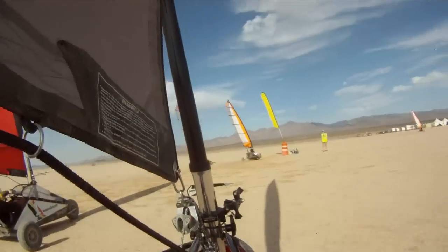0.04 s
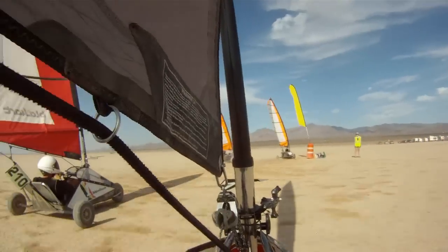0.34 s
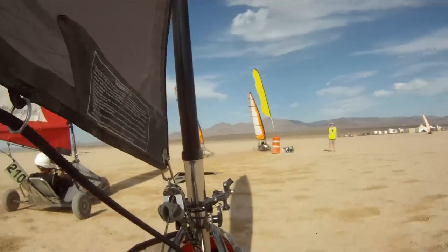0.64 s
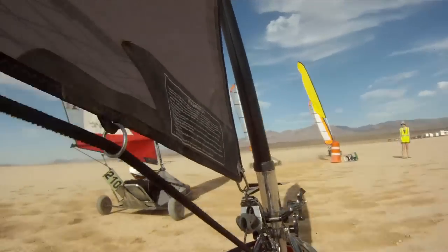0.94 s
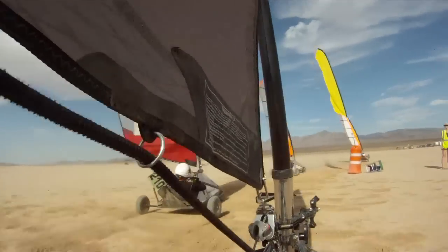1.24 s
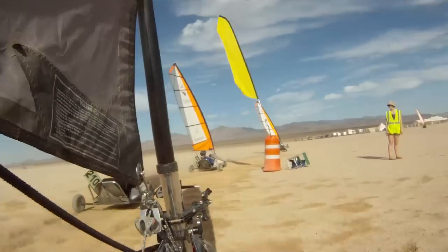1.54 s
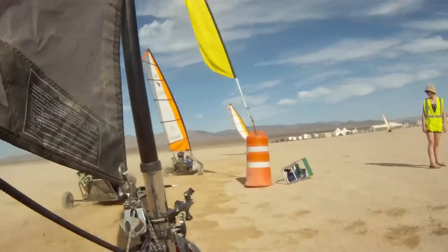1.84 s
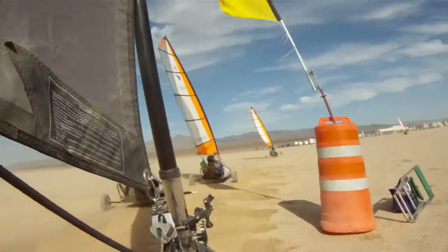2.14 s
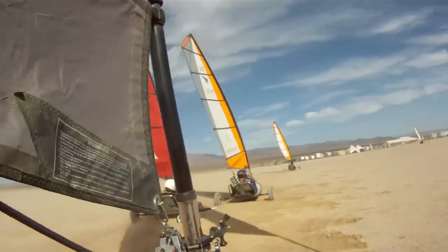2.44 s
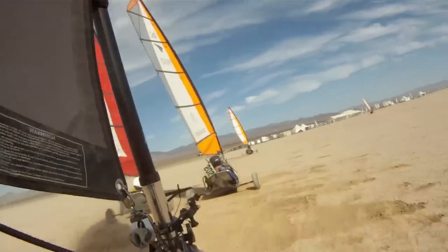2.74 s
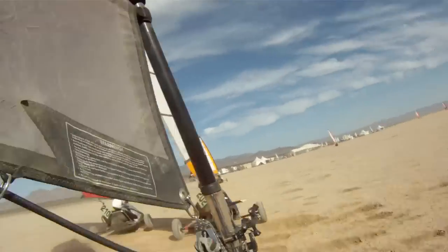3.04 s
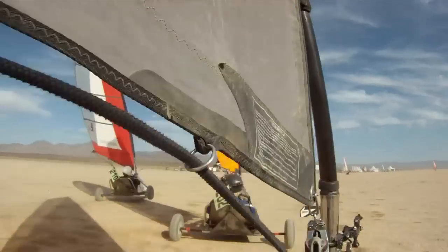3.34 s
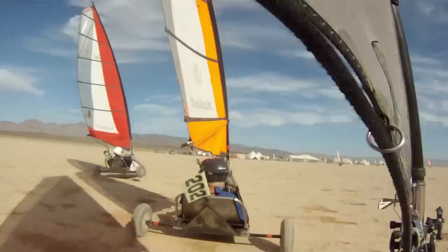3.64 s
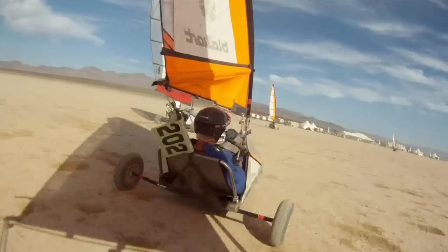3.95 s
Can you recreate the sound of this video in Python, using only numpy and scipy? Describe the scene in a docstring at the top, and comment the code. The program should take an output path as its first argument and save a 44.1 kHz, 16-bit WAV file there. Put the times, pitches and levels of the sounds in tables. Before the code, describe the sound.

A land-sailing kart rolls over hard ground, tyres hissing, frame rattling and booming louder.

```python
"""Land-sailing kart on a dry lake bed

The kart gathers speed over hard crust: wind and tyres hiss and crunch, steel fittings tick,
the rig knocks, the frame booms over bumps and the chassis shudders. It is heard from a camera on
the frame, which holds each sample at a low rate and so mirrors the sound into a gritty treble."""
import sys
import numpy as np
from scipy import signal
from scipy.fft import rfft, irfft, next_fast_len
from scipy.io import wavfile
from scipy.ndimage import uniform_filter1d, map_coordinates

SR = 44100
rng = np.random.default_rng(int(sys.argv[2]) if len(sys.argv) > 2 else 0)


def persist_wave(psi):
    """Save psi, clipped to +-1, as 16-bit WAV."""
    counts = np.round(np.clip(psi, -1, 1) * 32767).astype(np.int16)
    wavfile.write(sys.argv[1], SR, np.atleast_2d(counts).T)


N = 176400
TIME = np.arange(N) / SR


def amp(db):
    """Decibels to gain."""
    return 10 ** (np.asarray(db) / 20)


def unit(x):
    """Scale to rms 1."""
    return x / np.sqrt(np.mean(x ** 2) + 1e-20)


def curve(rows):
    """An automation curve through (time [s], value) rows."""
    return np.interp(TIME, *np.transpose(rows))


def wobble(knots_per_s):
    """A smooth random modulator."""
    knots = rng.standard_normal(int(N * knots_per_s / SR) + 4)
    return map_coordinates(knots, [TIME * knots_per_s])


def filtered(x, response):
    """Filter x by a function of frequency."""
    size = next_fast_len(N + SR // 2)
    return irfft(rfft(x, size) * response(np.fft.rfftfreq(size, 1 / SR)), size)[:N]


def equalised(x, points):
    """EQ x through (frequency [Hz], gain [dB]) points on a log axis."""
    freqs, db = np.transpose(points)
    return filtered(x, lambda hz: amp(np.interp(np.log(hz + 1), np.log(freqs + 1), db)))


def noise(points):
    """Equalised noise at rms 1."""
    return unit(equalised(rng.standard_normal(N), points))


def add(track, start_s, sound):
    """Mix a sound in at its cue."""
    part = track[max(round(start_s * SR), 0):][:len(sound)]
    part += sound[:len(part)]


def impacts(per_s, spread_db):
    """Impulses at random times with random sizes."""
    clicks = (rng.random(N) < per_s / SR) * rng.choice([-1, 1], N)
    return clicks * amp(spread_db * np.clip(rng.standard_normal(N), -2, 2))


def ring(modes, rise_s):
    """One contact and its softer bounce ring a set of modes, peak 1."""
    t = np.arange(SR // 8) / SR
    out = np.zeros(len(t))
    bounce_s = 0.0026 * (0.5 + rng.random())
    for start, contact_db in [(0, 0), (bounce_s, -4)]:
        tone = np.zeros(len(t))
        for hz, db, t60 in modes:
            decay = amp(contact_db + db + rng.normal(0, 1.48) - 60 * t / t60)
            tone += decay * np.sin(2 * np.pi * (hz * rng.normal(1, 0.01) * t + rng.random()))
        add(out, start, tone * (1 - np.exp(-t / rise_s)))
    return out / np.abs(out).max()


def strikes(cues, modes, rise_s):
    """Ring a set of modes at each (time [s], level [dB]) cue."""
    out = np.zeros(N)
    for start, db in cues:
        add(out, start, amp(db) * ring(modes, rise_s))
    return out


# Tone of the wind (frequency [Hz], gain [dB])
WIND_EQ = [(40, 0), (80, 5.5), (170, -3), (350, -1.5), (800, -2), (1200, -8), (3000, -25), (6000, -50)]

def wind():
    """Air rushing over the camera lays a faint, steady bed."""
    return amp(-67.5) * noise(WIND_EQ)


# Fader ride of the ground rumble (time [s], level [dB])
RUMBLE_RIDE = [(0.0, -61), (0.02, -65.5), (2.94, -55), (3.06, -51), (3.33, -54.5), (3.36, -47),
               (3.51, -53.5), (3.77, -52), (3.97, -62), (4.0, -42.5)]
# Tone of the rumble (frequency [Hz], gain [dB])
RUMBLE_EQ = [(15, -4), (30, -11), (60, 14.5), (100, 11), (125, 6), (160, -0.5), (220, -1), (320, -7.5),
             (500, -13.5), (900, -38.5)]

def ground_rumble():
    """Rolling over hard ground fills out the low end."""
    return amp(curve(RUMBLE_RIDE) + 6.5) * noise(RUMBLE_EQ)


# Fader ride of the rolling noise (time [s], level [dB])
ROLL_RIDE = [(0.0, -59), (0.99, -58.5), (1.57, -54.5), (2.53, -55), (2.66, -52.5), (2.96, -50),
             (3.12, -49.5), (3.49, -49), (3.59, -47.5), (3.72, -48), (4.0, -49.5)]
# Tone of the tyres and rushing air (frequency [Hz], gain [dB])
HISS_EQ = [(180, -30.5), (300, -7.5), (335, -3.5), (361, -8.5), (452, -9.5), (671, -11), (809, -10.5),
           (904, -3.5), (1050, -4.5), (1190, -3.5), (1310, -10.5), (1450, -4), (1830, -6.5), (2180, 2),
           (2380, -7), (2620, -4), (2860, -12.5), (3670, -13), (4050, -19.5), (5320, -19), (5800, -18.5),
           (7540, -57), (12800, -120)]

def tyres():
    """The tyres hiss, scrub sideways in surges and break the crust, all building with the pace."""
    scrub_hz, half_width_hz = 2060, 150
    ride_db = curve(ROLL_RIDE)
    hiss = amp(1.48 * wobble(35)) * noise(HISS_EQ)
    band = filtered(rng.standard_normal(N), lambda hz: 1 / (1 + ((hz - scrub_hz) / half_width_hz) ** 2))
    scrub = amp(-10.5) * unit(band * amp(4 * wobble(24.99)))
    grit = unit(equalised(impacts(per_s=300, spread_db=6.5), HISS_EQ))
    grit_db = -7 + 0.2 * (ride_db - ride_db.mean())  # the crunch builds faster than the hiss
    return amp(ride_db + 0.28) * (hiss + scrub + amp(grit_db) * grit)


# Clear ticks of the fittings (time [s], level [dB])
TICK_CUES = [(0.3346, -52), (0.5646, -54), (0.5921, -57), (0.946, -53), (0.9893, -56), (1.1858, -34.5),
             (1.1902, -44), (1.2294, -51), (1.2615, -50), (1.4296, -49.5), (1.512, -41.5), (1.5549, -42.5),
             (1.6146, -49), (1.704, -44), (1.7464, -45), (1.7634, -52), (1.7794, -49), (1.8062, -47.5),
             (1.8188, -46), (1.8592, -48), (1.884, -42), (1.903, -47.5), (1.951, -49), (2.0742, -45),
             (2.093, -43), (2.1191, -46.5), (2.6517, -38), (2.7292, -44), (2.9677, -42), (3.1777, -40.5),
             (3.473, -38.5)]
# Fader ride of the loose jingle between them (time [s], level [dB])
JINGLE_RIDE = [(0, -79), (1.1, -84.5), (1.5, -77), (1.85, -66.5), (2.0, -78), (2.27, -64.5), (2.42, -78.5),
               (2.6, -67.5), (4, -63)]
# Ring of the steel (frequency [Hz], level [dB], decay T60 [s])
STEEL_MODES = [(3468, 7.5, 0.0073), (3696, 2.5, 0.02), (4234, 2.5, 0.011), (4560, 9, 0.0042),
               (5237, 1, 0.011)]

def fittings():
    """Shackles and blocks tick and jingle against the mast foot."""
    rise_s = 0.0008
    jingle = np.zeros(N)
    for _ in range(2):
        contacts = impacts(per_s=50, spread_db=4)
        jingle += signal.fftconvolve(contacts, ring(STEEL_MODES, rise_s))[:N]
    ticks = amp(0.5) * strikes(TICK_CUES, STEEL_MODES, rise_s)
    return ticks + amp(curve(JINGLE_RIDE)) * unit(jingle)


# Knocks of the rig (time [s], level [dB], centre [Hz], spread [octaves], crack trim [dB])
KNOCK_CUES = [(1.185, -41, 1530, 0.52, -1), (1.1875, -37.5, 1270, 0.35, -17), (1.1915, -48, 1840, 0.41, -1),
              (1.229, -47.5, 1770, 0.62, -15), (1.903, -46, 1300, 0.51, -6), (1.906, -40, 1080, 0.35, -19),
              (2.458, -43.5, 1390, 0.53, -18), (2.489, -46.5, 2000, 0.28, -5),
              (2.531, -44, 2030, 0.33, 0.5), (2.564, -37, 1430, 0.27, -17), (2.635, -40.5, 1930, 0.33, -7),
              (2.668, -39.5, 1690, 0.17, -18), (2.693, -44.5, 1780, 0.4, -22), (2.907, -43, 1920, 0.22, -7),
              (2.913, -35, 1950, 0.42, -13), (3.014, -41, 2160, 0.26, -10), (3.036, -42.5, 2040, 0.17, -3),
              (3.072, -37.5, 1090, 0.33, -22), (3.084, -44, 1060, 0.52, 1.5),
              (3.209, -35.5, 1780, 0.36, -22), (3.254, -41, 1640, 0.24, -28),
              (3.368, -43, 1300, 0.71, -6.5), (3.392, -33, 1210, 0.16, -32), (3.409, -43, 1560, 0.35, -22),
              (3.441, -38.5, 1370, 0.27, -6.5), (3.458, -40, 1820, 0.31, -8),
              (3.49, -42.5, 2140, 0.41, -18), (3.523, -36.5, 2160, 0.32, -19),
              (3.588, -41, 1570, 0.68, -11), (3.649, -39.5, 1770, 0.53, -1),
              (3.761, -41.5, 1660, 0.64, -13), (3.781, -44.5, 1800, 0.54, -4),
              (3.894, -40.5, 1650, 0.57, -14), (3.928, -45.5, 1840, 0.29, -7),
              (3.959, -41.5, 1620, 0.69, -3.5)]
# Ring of the rig (frequency [Hz], level [dB], decay T60 [s])
RIG_MODES = [(590, -2.5, 0.016), (910, 0.5, 0.017), (1088, -3.5, 0.017), (1180, -1.5, 0.012),
             (1453, -1, 0.012), (1706, -2.5, 0.013), (2086, 1, 0.019), (2237, -1.5, 0.015),
             (2580, -2.5, 0.019), (3480, 8.5, 0.0062)]
# Tone of a knock's crack (frequency [Hz], gain [dB])
CRACK_EQ = [(150, 7), (600, -8), (1500, -6.5), (3500, 1.5), (4500, -9), (5800, -3.5), (7000, -40)]

def rig_knocks():
    """Each knock rings the rig around its own centre pitch and carries a bright crack at its own level."""
    body_span_s, crack_rise_s, crack_t60_s = 0.0063, 0.00067, 0.022
    t = np.arange(SR // 20) / SR
    crack_shape = amp(8 - 60 * t / crack_t60_s) * (1 - np.exp(-t / crack_rise_s))
    bodies, crack_envelope = np.zeros(N), np.zeros(N)
    for start, db, centre_hz, spread, crack_db in KNOCK_CUES:
        modes = []
        for hz, mode_db, t60 in RIG_MODES:
            emphasis = np.exp(-(np.log2(hz / centre_hz) / (spread + 0.058)) ** 2 / 2)
            modes.append((hz, mode_db + 10 * np.log10(emphasis + 1e-3), t60))
        body = ring(modes, rise_s=0.0009)
        body *= np.sqrt(body_span_s * SR / np.sum(body ** 2))  # the energy of rms 1 over that span
        add(bodies, start, amp(db - 0.07) * body)
        add(crack_envelope, start, amp(db + crack_db) * crack_shape)
    return bodies + crack_envelope * noise(CRACK_EQ)


# Thuds of the frame (time [s], level [dB])
THUD_CUES = [(1.182, -45.5), (1.211, -56), (1.902, -44.5), (2.562, -46), (2.679, -41), (2.719, -45),
             (3.084, -37.5), (3.359, -43.5), (3.469, -40.5), (3.653, -36), (3.714, -44.5), (3.763, -47)]
# Ring of the frame (frequency [Hz], level [dB], decay T60 [s])
FRAME_MODES = [(64.4, 3.5, 0.31), (120, 2.5, 0.13), (170.4, -4.5, 0.072), (209, -1.5, 0.096),
               (245.5, -5.5, 0.092), (349, -6, 0.07), (480, -9, 0.058)]

def frame_thuds():
    """The frame bottoms out and rings with a dull thud."""
    return amp(6.5) * strikes(THUD_CUES, FRAME_MODES, rise_s=0.0027)


# Bumps in the lake bed (crest time [s], level [dB])
BUMP_CUES = [(1.219, -40), (1.378, -35.5), (1.772, -41.5), (1.868, -43), (2.489, -33), (2.59, -32),
             (2.699, -28.5), (3.088, -27), (3.249, -34), (3.408, -30), (3.499, -32.5), (3.651, -31.5),
             (3.718, -31), (3.78, -29), (3.911, -34.5), (3.989, -33.5)]

def frame_booms():
    """Each bump sets the frame booming: a low tone with a quick swell and a slower fade."""
    boom_hz, rise_s, fall_s = 92.3, 0.022, 0.049
    out = np.zeros(N)
    for crest, db in BUMP_CUES:
        t = TIME - crest
        width_s = np.where(t < 0, rise_s, fall_s)
        swell = 1 / np.cosh(np.clip(2 * t / width_s, -20, 20))
        hz = boom_hz * rng.normal(1, 0.055)
        out += amp(db + 1) * swell * np.sin(2 * np.pi * (hz * t + rng.random()))
    return out


# Swells of the chassis shudder (time [s], length [s], level [dB])
SHUDDER_SWELLS = [(0.0, 0.067, -34), (0.087, 0.095, -36.5), (0.2, 0.077, -37.5), (0.262, 0.23, -36),
                  (0.499, 0.099, -31), (0.603, 0.096, -39.5), (0.744, 0.19, -39.5), (0.902, 0.11, -34),
                  (1.044, 0.35, -33.5), (1.369, 0.18, -34), (1.507, 0.16, -32.5), (1.682, 0.1, -32.5),
                  (1.759, 0.2, -26.5), (1.962, 0.16, -32.5), (2.092, 0.25, -28.5), (2.328, 0.28, -33),
                  (2.521, 0.1, -29.5), (2.639, 0.17, -27.5), (2.793, 0.18, -34), (3.01, 0.093, -28),
                  (3.103, 0.15, -32), (3.223, 0.12, -29), (3.341, 0.15, -22.5), (3.49, 0.069, -29),
                  (3.584, 0.23, -27.5), (3.779, 0.13, -29.5), (3.917, 0.15, -28.5)]

def chassis_shudder():
    """The chassis's wavering sub-bass resonance swells and ebbs irregularly."""
    shudder_hz, wander_hz, overlap_s = 38.9, 3.6, 0.0017
    cycles = np.cumsum(shudder_hz + wander_hz * wobble(22)) / SR
    out = np.zeros(N)
    for start, length, db in SHUDDER_SWELLS:
        progress = np.clip((TIME - start + overlap_s) / (length + 2 * overlap_s), 0, 1)
        arch = np.abs(np.sin(np.pi * progress)) ** 0.69
        swell = uniform_filter1d(arch, size=700)  # soften the edges
        out += amp(db - 0.15) * swell * np.sin(2 * np.pi * (cycles + rng.random()))
    flutter = amp(1.5 * wobble(33))
    return out * flutter


def scene():
    """A mono mix with everything close by, in open air."""
    bed = wind() + ground_rumble() + tyres()
    rattles = fittings() + rig_knocks()
    low_end = frame_thuds() + frame_booms() + chassis_shudder()
    return (bed + rattles + low_end)[None]


# The camera's input response (frequency [Hz], gain [dB])
CAMERA_EQ = [(10, -5), (25, 3), (5300, -1.5), (5600, -6), (6000, -13), (6500, -40), (8000, -90)]

def record(dry):
    """The camera keeps a narrow band; holding its samples mirrors that band around the hold rate."""
    hold_hz, top_hz = 12000, 15350
    band = equalised(dry[0], CAMERA_EQ)
    slope = filtered(band, lambda hz: 1j * hz)
    sidebands = slope * 2 * np.cos(2 * np.pi * hold_hz * TIME)
    mirror = filtered(sidebands, lambda hz: -1j / np.maximum(hz, hold_hz / 2))  # the hold's roll-off
    return filtered(band + amp(0.5) * mirror, lambda hz: hz < top_hz)[None]


dry = scene()
out = record(dry)
persist_wave(out)
```